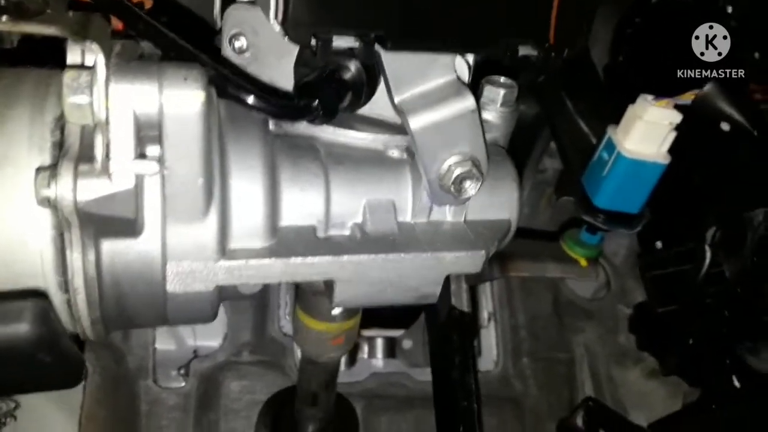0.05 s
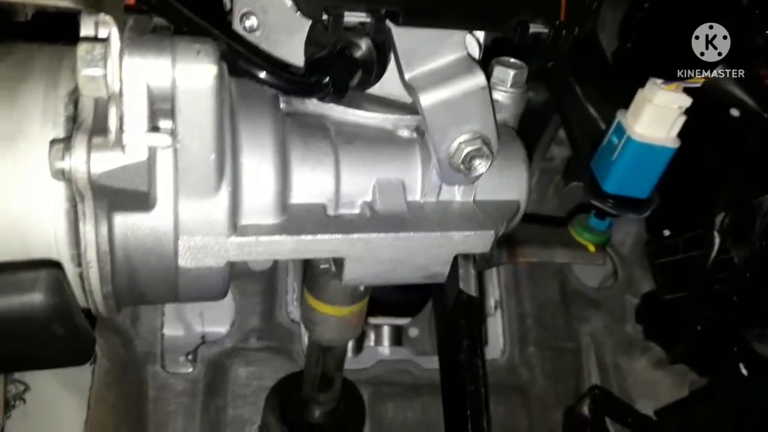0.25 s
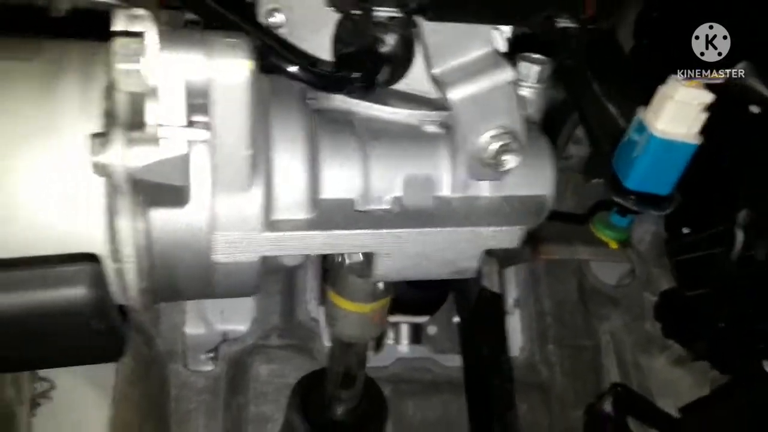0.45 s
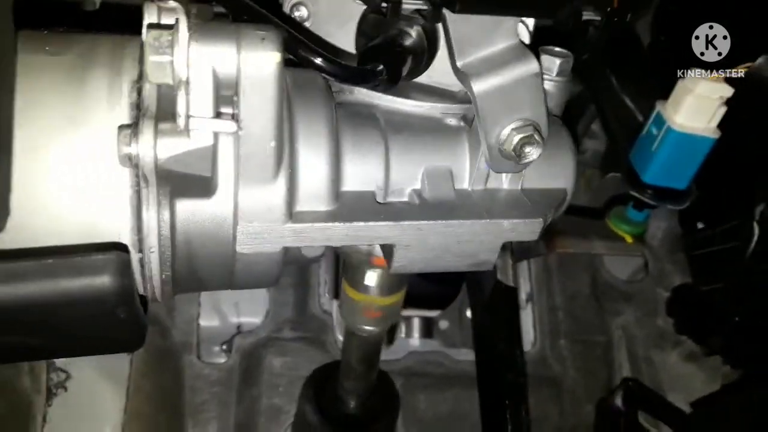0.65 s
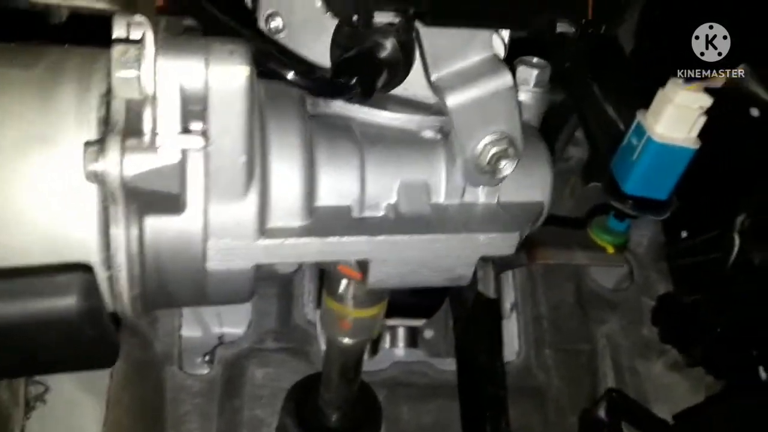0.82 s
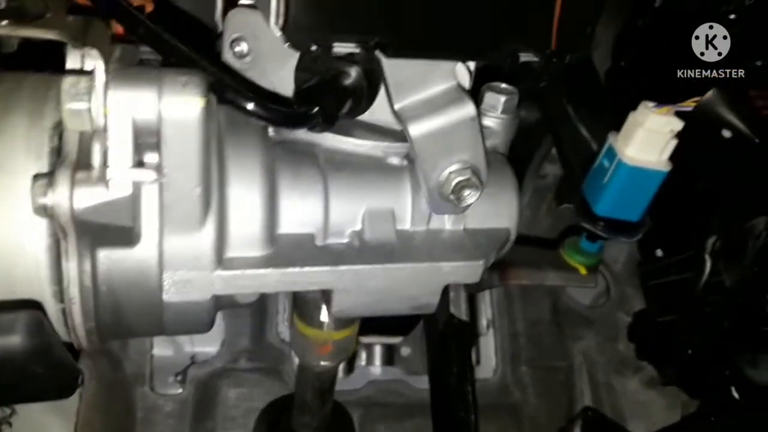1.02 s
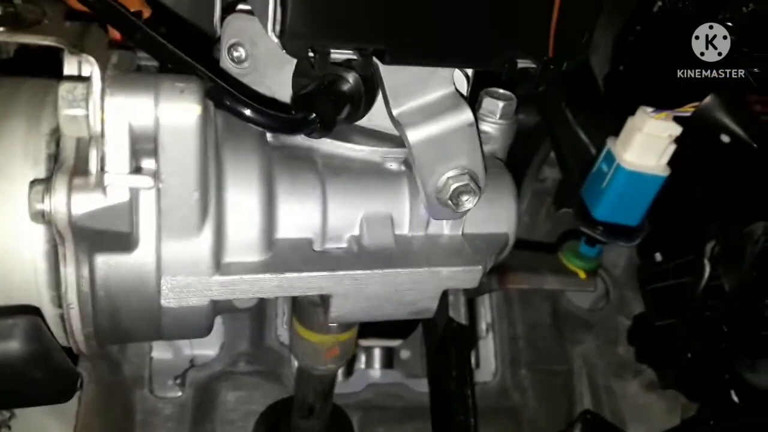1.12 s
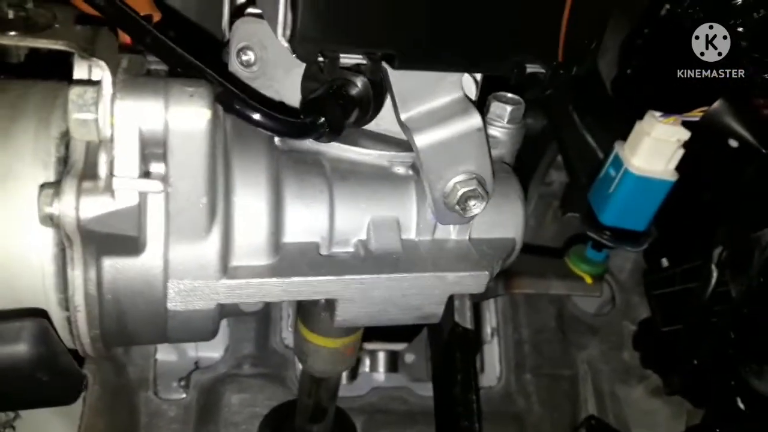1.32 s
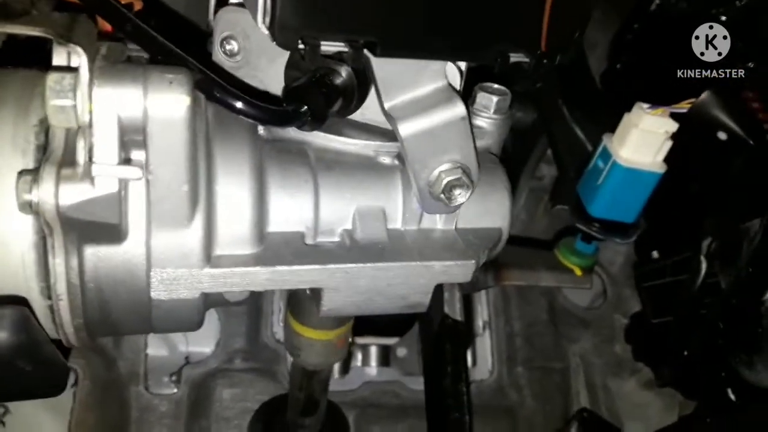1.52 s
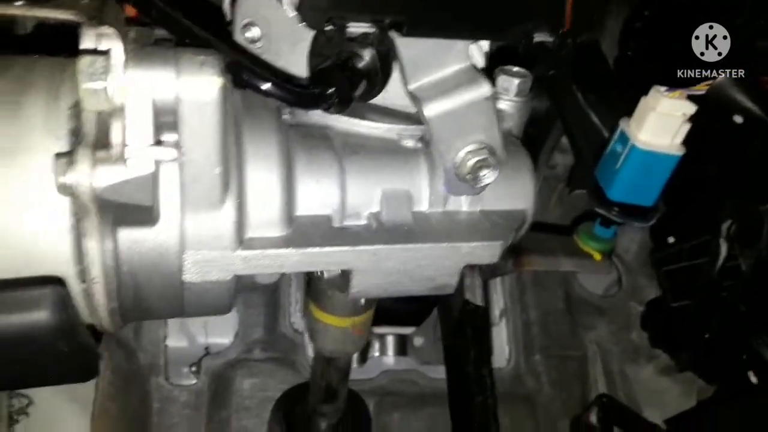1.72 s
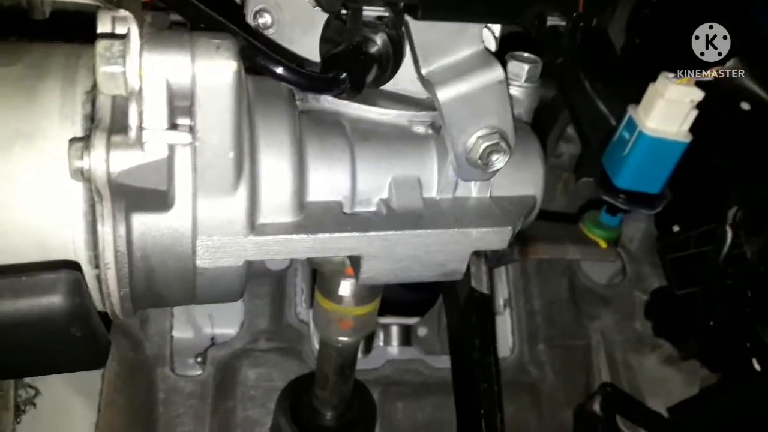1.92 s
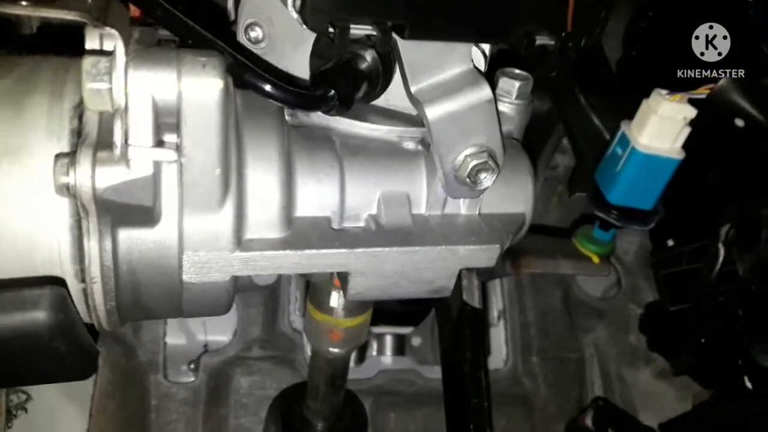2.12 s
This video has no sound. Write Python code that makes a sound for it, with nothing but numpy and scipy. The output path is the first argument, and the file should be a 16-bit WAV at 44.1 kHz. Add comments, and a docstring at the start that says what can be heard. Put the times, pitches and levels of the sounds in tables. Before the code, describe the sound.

Clacking, booming knocks from a steering column rocked by hand inside a quiet car.

```python
"""Clacking, booming knocks, close by in a quiet car: the steering column is rocked to and fro by hand.
At each reversal the play in its gears closes: the metal case clacks, the housing rings, the column
thuds and the dashboard booms. Between knocks the column nudges its mounts, loose parts tick and
the shaft faintly rubs and whines over a low hum."""
import sys
import numpy as np
from scipy import signal
from scipy.fft import rfft, irfft
from scipy.io import wavfile

SR = 44100
rng = np.random.default_rng(int(sys.argv[2]) if len(sys.argv) > 2 else 0)


def inscribe(sig):
    """Save sig as 16-bit PCM at rate SR to the path in sys.argv[1].

    A 1-D sig is mono; a 2-D sig holds one channel per row.
    Samples are clipped to [-1, 1] before scaling.
    """
    pcm = np.round(np.clip(np.atleast_2d(sig).T, -1, 1) * 32767)
    wavfile.write(sys.argv[1], SR, pcm.astype(np.int16))


N = 94815


# Gear impacts (time [s], direction [sign, + forward], gain [dB], low-pass [Hz],
# rattle [dB], metal [dB], housing [dB], boom [dB])
KNOCKS = [(.1991, 0.96, 1, 6100, -1.5, 1, 1.5, 1), (.5774, -1, 1, 4200, -4.5, -6, 0, 2.5),
          (1.4770, 1, 0.5, 8560, -1, 8.5, 4, 1), (1.6905, -1.58, -7.5, 540, -10, -10, -4, 2.5),
          (1.7971, -1, 1.5, 4200, -5, -10, 0.5, 1), (1.8502, -1, 2.5, 1900, -8.5, -7, -1.5, -2)]

def knock(direction, gain_db, lowpass_hz, rattle_db, metal_db, housing_db, boom_db):
    """The gears meet with a clack and a thud; each knock has its own brightness."""
    t = np.arange(SR // 2) / SR
    case = clack(rattle_db, metal_db, t) - amp(housing_db) * housing(direction, t)
    lowpass = signal.butter(2, lowpass_hz, fs=SR)
    blow = signal.lfilter(*lowpass, case + thud(direction, boom_db, t))
    return np.sign(direction) * amp(gain_db) * blow


# Contact rattle (frequency [Hz], relative density [dB])
RATTLE_SPECTRUM = [(150, 0.5), (400, 1), (750, 5), (1100, -10.5), (1600, -3), (2250, 0), (3500, -6.5),
                   (4100, -7), (4700, -8.5), (5400, -11.5), (6100, -15), (6900, -5.5), (7800, -26),
                   (12000, -18.5), (16000, -14.5)]
# Rattle decay (frequency [Hz], t60 [s])
RATTLE_DECAY = [(200, 0.051), (800, 0.065), (2200, 0.057), (6000, 0.046), (15000, 0.041)]
# Gear case metal (frequency [Hz], level [dB], t60 [s])
CASE_MODES = [(652, -24.5, .03), (803, -29.5, 0.049), (1900, -36.5, 0.048), (2160, -24.5, 0.023),
              (2280, -29.5, 0.035), (2770, -36, 0.018), (2883, -28, 0.021), (3115, -33, 0.033),
              (3700, -42, 0.024), (5540, -49, 0.14), (5440, -28.5, 0.016), (6676, -34, 0.039)]

def clack(rattle_db, metal_db, t):
    """The contact rattles densely and rings the gear case."""
    rattle = amp(rattle_db - 19) * decay(shaped_noise(RATTLE_SPECTRUM, len(t)), RATTLE_DECAY)
    metal = amp(metal_db) * ring(CASE_MODES, t)
    return rise(t, rise_s=0.00078) * (rattle + metal)


# Cast housing (frequency [Hz], forward level [dB], back level [dB], t60 [s])
HOUSING_MODES = [(556.4, -19.5, -23.5, 0.071), (636, -29.5, -23, 0.056), (796, -25, -20, 0.082),
                 (819, -23.5, -44, 0.07), (1031, -25, -32.5, 0.049), (1283, -33, -32.5, 0.068)]

def housing(direction, t):
    """The cast housing rings in the midrange."""
    return rise(t, rise_s=0.0025) * ring(flank(HOUSING_MODES, direction), t)


# Column in its mounts (frequency [Hz], forward level [dB], back level [dB], t60 [s])
COLUMN_MODES = [(232.2, 4.5, 4.5, .023), (275.7, -1.5, -15, 0.037), (439.8, -19, -24, 0.14)]
# Dashboard and footwell (frequency [Hz], forward level [dB], back level [dB], t60 [s])
DASHBOARD_MODES = [(92.25, -18, -24, 0.44), (125.3, -4.5, -6, 0.18), (154.2, -4, -6.5, 0.08),
                   (205.4, -29, -15, .09)]

def thud(direction, boom_db, t):
    """The column swings and the dashboard recoils the other way."""
    column = rise(t, rise_s=0.0054) * ring(flank(COLUMN_MODES, direction), t)
    boom = rise(t, rise_s=0.011) * ring(flank(DASHBOARD_MODES, direction), t)
    return amp(boom_db) * boom - column


# Pushes on the column mounts (time [s], gain [dB])
NUDGES = [(.296, -14.5), (.372, -26.5), (.655, -26), (1.135, -24), (1.59, -20.5)]

def nudge(gain_db, lowpass_hz=250):
    """A soft push wakes only the low modes."""
    push = thud(direction=1, boom_db=0, t=np.arange(SR // 2) / SR)
    return amp(gain_db) * signal.lfilter(*signal.butter(2, lowpass_hz, fs=SR), push)


# Taps of loose parts (time [s], gain [dB], pitch [Hz])
TICKS = [(.390, -49, 2640), (.4050, -40.5, 1160), (.6442, -32.5, 1440), (.9921, -45.5, 1200),
         (1.468, -26, 584), (1.529, -48, 4040), (1.5399, -35, 1160), (1.859, -31.5, 1700)]

def tick(gain_db, pitch_hz, width_oct=0.42, t60_s=0.029):
    """A loose part taps lightly, with a short, broad ring."""
    t = np.arange(SR // 8) / SR
    burst = noise(lambda hz: (1 + (np.log2((hz + 1) / pitch_hz) / width_oct) ** 2) ** -2, len(t))
    return amp(gain_db) * burst * rise(t, rise_s=0.00044) * fall(t, t60_s)


# Rub envelope (time [s], level [dB])
RUB_ENVELOPE = [(0, -55.5), (.17, -54.5), (.32, -56), (.37, -61.5), (.5, -56), (.7, -53), (.8, -61),
                (.87, -68), (.97, -62.5), (1.06, -55.5), (1.42, -58), (1.54, -56), (1.62, -70.5),
                (1.74, -56), (1.92, -54.5), (2.14, -64.5)]
# Rub hiss (frequency [Hz], relative density [dB])
RUB_SPECTRUM = [(1200, 0), (2400, 4.5), (2800, -3.5), (3300, -2.5), (4400, -3), (5000, -7), (5600, 4),
                (6200, -4), (6900, -1), (7800, -15.5), (10000, -16.5)]

def shaft_rub():
    """The turning shaft rubs with a faint hiss that swells and dips."""
    return envelope(RUB_ENVELOPE) * shaped_noise(RUB_SPECTRUM, N)


# Whine envelope (time [s], gain [dB])
WHINE_ENVELOPE = [(0, -80), (.08, -61.5), (.17, -58), (.25, -61.5), (.3, -55), (.33, -63), (.39, -64.5),
                  (.46, -70.5), (1.0, -71), (1.15, -65), (1.3, -64.5), (1.45, -66), (1.551, -72.5),
                  (2.14, -75)]
# Whine tones (centre [Hz], width [Hz], relative level [dB])
WHINE_BANDS = [(2744, 150, 2.5), (4220, 110, -6), (5470, 420, -5.5)]

def gear_whine(flutter_db=4, flutter_hz=30):
    """The turning gears give a thin, fluttering whine."""
    wobble = noise(lambda hz: np.exp(-(hz / flutter_hz) ** 2), N)
    flutter = unit_rms(amp(flutter_db * wobble))
    return envelope(WHINE_ENVELOPE) * flutter * tones(WHINE_BANDS)


# Cabin decay (frequency [Hz], t60 [s])
CABIN_DECAY = [(100, 0.55), (250, .42), (420, 0.27), (1000, 0.16), (6000, 0.038)]

def cabin_reverb(x, wet_db=-19):
    """The upholstered cabin adds a short, dull tail."""
    tail = decay(rng.standard_normal(SR // 2), CABIN_DECAY)
    return amp(wet_db) * signal.fftconvolve(x, tail / np.linalg.norm(tail))[:N]


# Hum tones (centre [Hz], width [Hz], level [dB])
HUM_BANDS = [(98.6, 15, -39), (235.2, 12, -44), (443.5, 67, -49.5)]
# Cabin rumble and hiss (frequency [Hz], relative density [dB])
RUMBLE_SPECTRUM = [(25, -6), (45, -10.5), (62, 0.5), (85, 0.5), (120, 3.5), (160, -1.5), (250, -7),
                   (340, -8.5), (450, -13), (600, -19.5), (1000, -22), (1600, -32), (2600, -36.5),
                   (4500, -44), (7000, -48.5), (8500, -57), (11500, -46.5), (15500, -50.5)]

def background(rumble_db=-35.5):
    """A wavering hum over the cabin's rumble and hiss."""
    return tones(HUM_BANDS) + amp(rumble_db) * shaped_noise(RUMBLE_SPECTRUM, N)


def flank(modes, direction):
    """Each gear flank excites the modes with its own strengths."""
    return [(hz, forward if direction > 0 else back, t60_s) for hz, forward, back, t60_s in modes]


def ring(modes, t):
    """Damped modes struck from rest."""
    return sum(amp(db) * fall(t, t60_s) * np.sin(2 * np.pi * hz * t) for hz, db, t60_s in modes)


def rise(t, rise_s):
    """Smooth attack."""
    return 1 - np.exp(-t / rise_s)


def fall(t, t60_s):
    """Exponential decay, 60 dB in t60_s."""
    return np.exp(-np.log(1000) * t / t60_s)


def decay(x, points):
    """Each band of x dies away at its own rate."""
    hz, t, spectrum = np.fft.rfftfreq(len(x), 1 / SR), np.arange(len(x)) / SR, rfft(x)
    centres_hz, t60s = np.transpose(points)
    weights = (log_interp(np.c_[centres_hz, share], hz) for share in np.eye(len(t60s)))
    return sum(irfft(spectrum * weight, len(x)) * fall(t, t60_s) for weight, t60_s in zip(weights, t60s))


def noise(gain, size):
    """Noise of rms 1 whose spectrum follows gain(hz)."""
    hz = np.fft.rfftfreq(size, 1 / SR)
    return unit_rms(irfft(gain(hz) * np.exp(2j * np.pi * rng.random(len(hz))), size))


def shaped_noise(spectrum, size):
    """Noise of rms 1 with a tabulated spectrum."""
    return noise(lambda hz: amp(log_interp(spectrum, hz)), size)


def tones(bands):
    """Narrow noise bands, heard as wavering tones."""
    return sum(amp(db) * noise(lambda hz: 1 / (1 + (2 * (hz - centre_hz) / width_hz) ** 2), N)
               for centre_hz, width_hz, db in bands)


def envelope(points):
    """Gain per sample, interpolated in dB."""
    return amp(np.interp(np.arange(N) / SR, *np.transpose(points)))


def log_interp(points, hz):
    """Table lookup on a log-frequency axis."""
    knots_hz, values = np.transpose(points)
    return np.interp(np.log(hz + 1), np.log(knots_hz + 1), values)


def amp(db):
    """Decibels to gain."""
    return 10 ** (np.asarray(db) / 20)


def unit_rms(x):
    """Scales to rms 1."""
    return x / np.sqrt(np.mean(x ** 2) + 1e-20)


def scene():
    """All blows in the cabin, over whine, rub and background."""
    blows = np.zeros(N)
    for table, source in (KNOCKS, knock), (TICKS, tick), (NUDGES, nudge):
        for time_s, *settings in table:
            start = round(time_s * SR)
            sound = source(*settings)[:N - start]
            blows[start:start + len(sound)] += sound
    return (blows + cabin_reverb(blows) + gear_whine() + shaft_rub() + background())[None]


def record(dry, low_cut_hz=20, high_cut_hz=15700):
    """Microphone bass roll-off and a steep treble limit."""
    thinned = signal.lfilter(*signal.butter(1, low_cut_hz, "high", fs=SR), dry)
    lowpass = signal.firwin(511, high_cut_hz, window=("kaiser", 9), fs=SR)
    return signal.oaconvolve(thinned, lowpass[None], "same")


dry = scene()
out = record(dry)
inscribe(out)
```